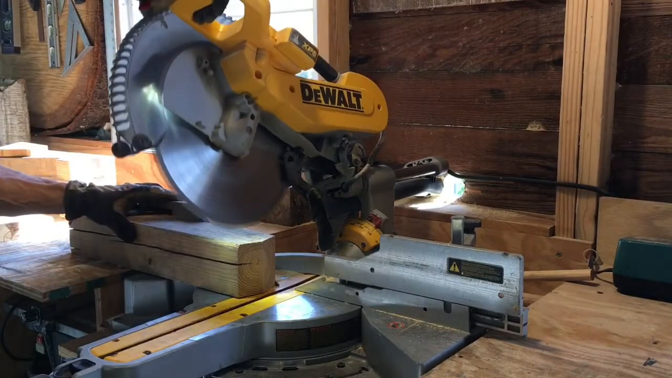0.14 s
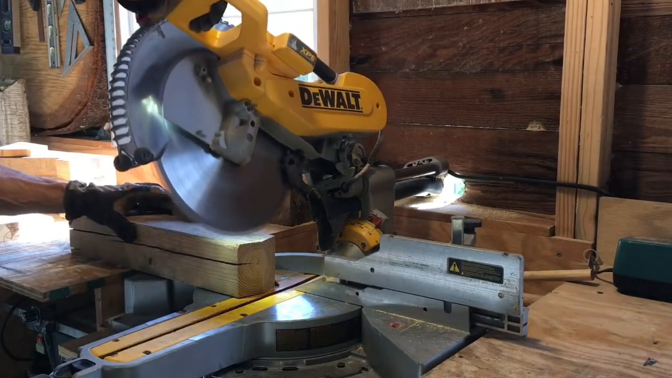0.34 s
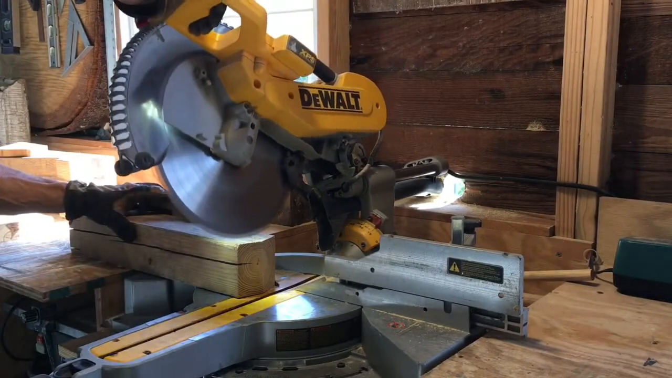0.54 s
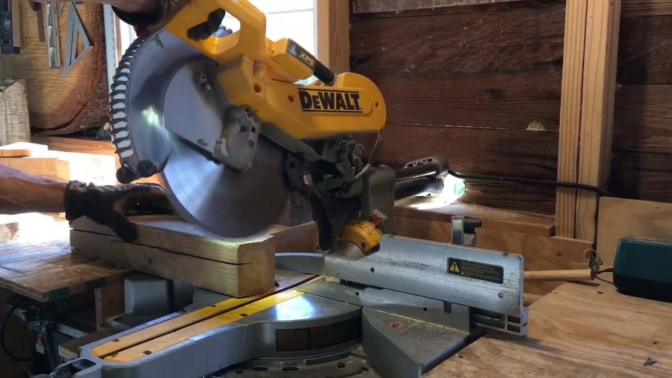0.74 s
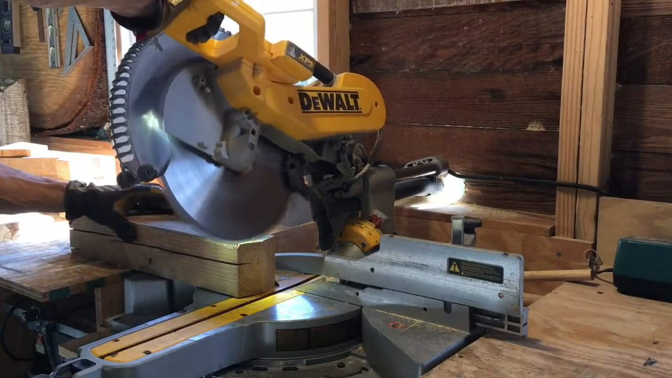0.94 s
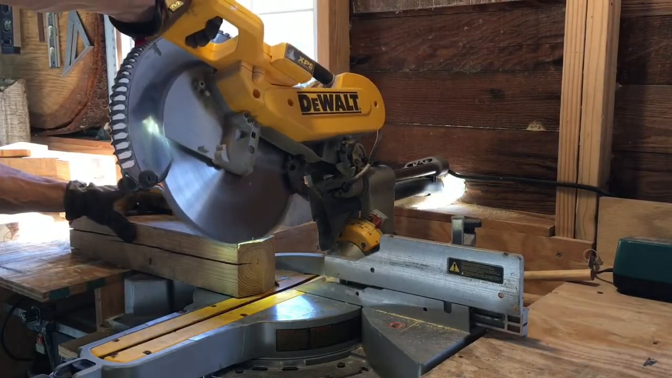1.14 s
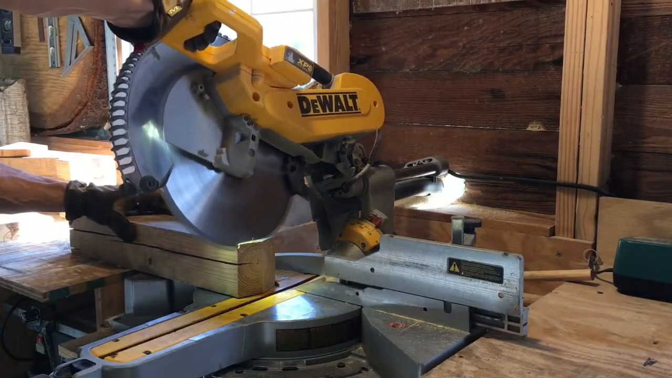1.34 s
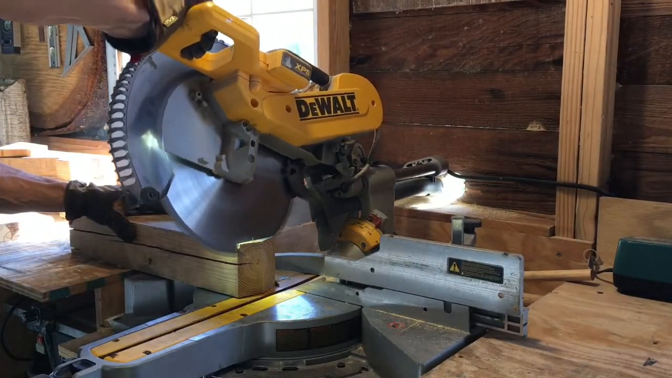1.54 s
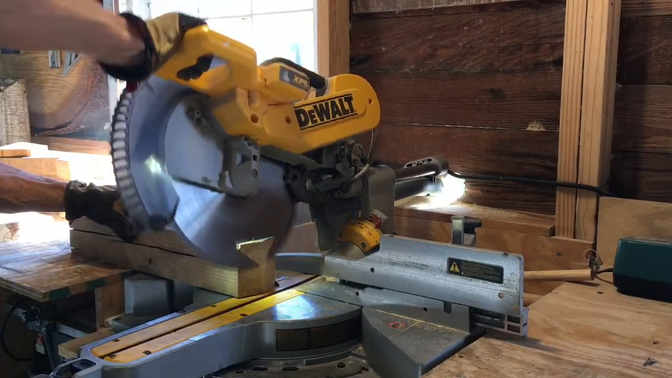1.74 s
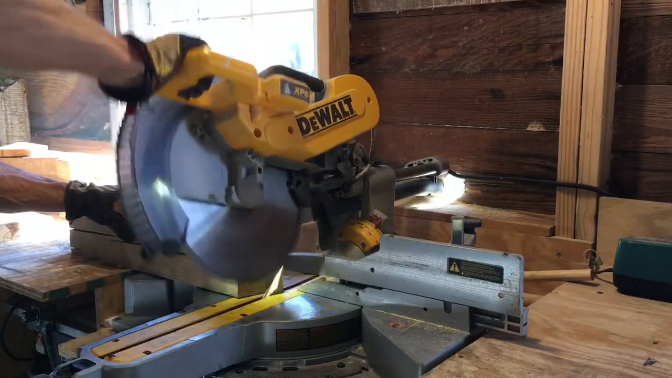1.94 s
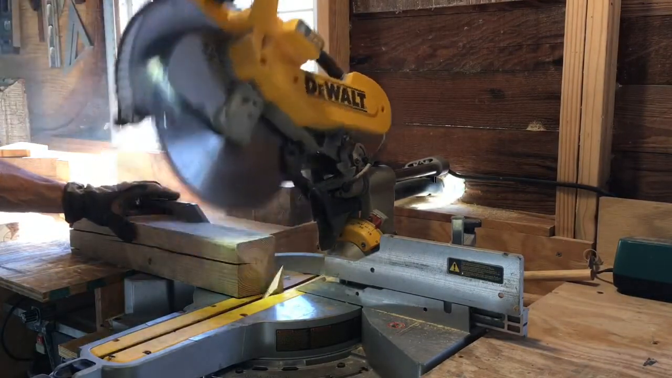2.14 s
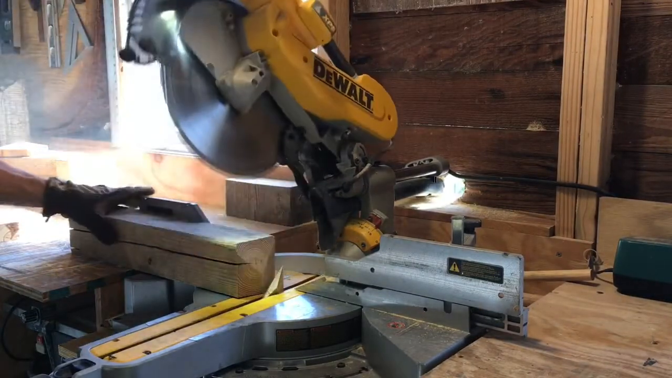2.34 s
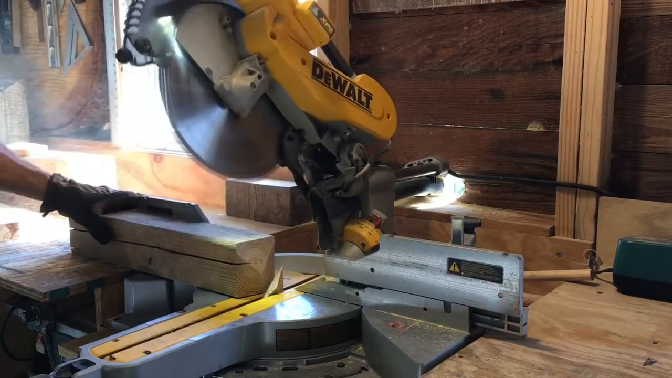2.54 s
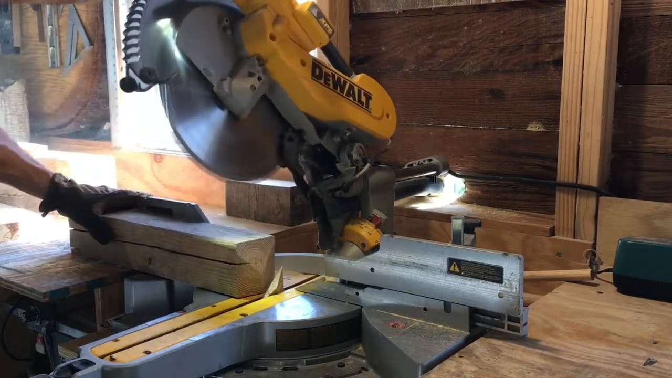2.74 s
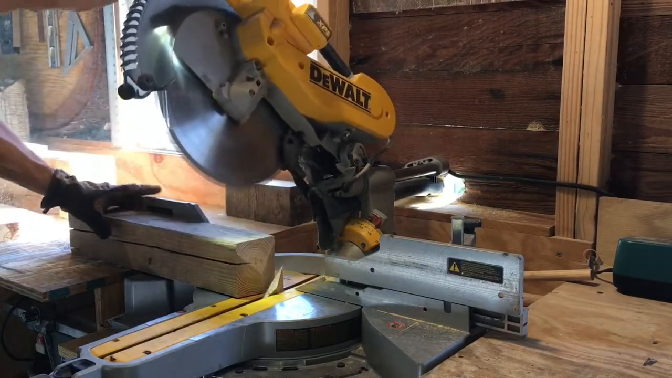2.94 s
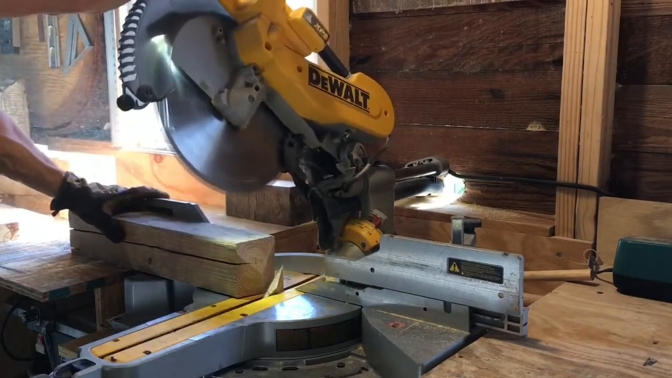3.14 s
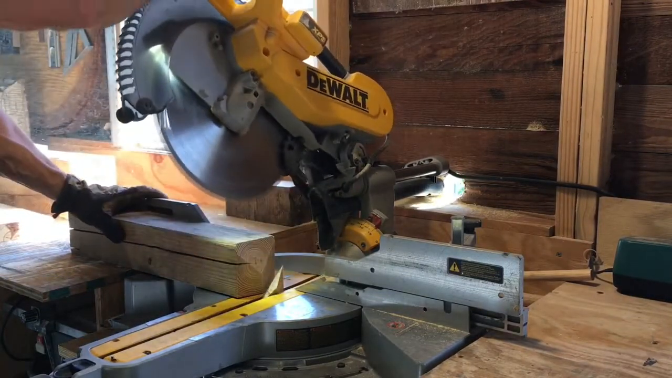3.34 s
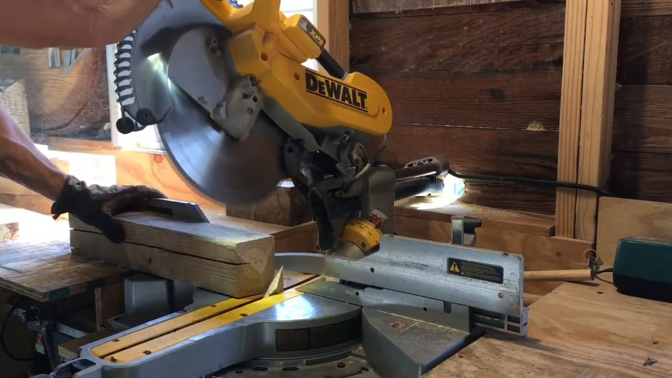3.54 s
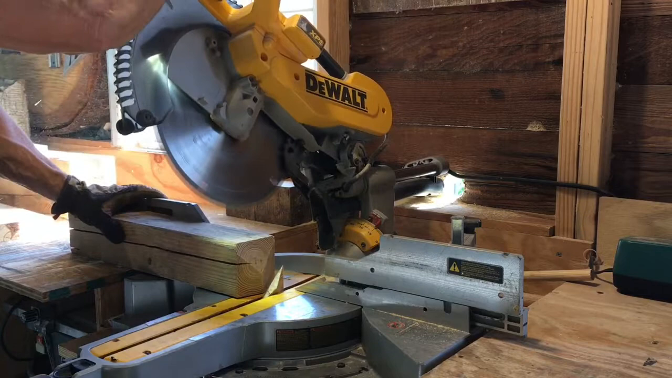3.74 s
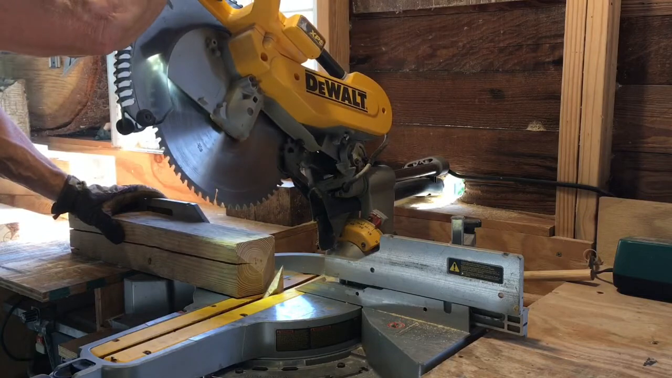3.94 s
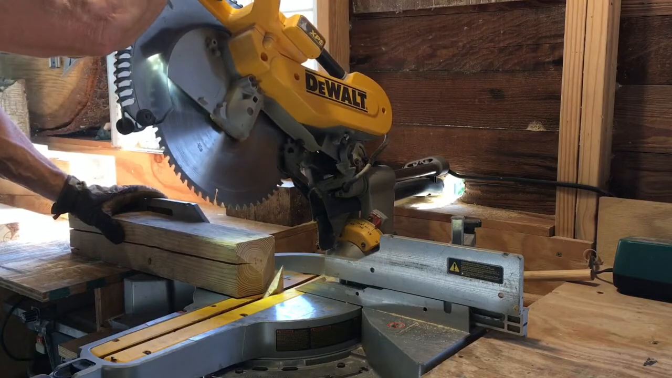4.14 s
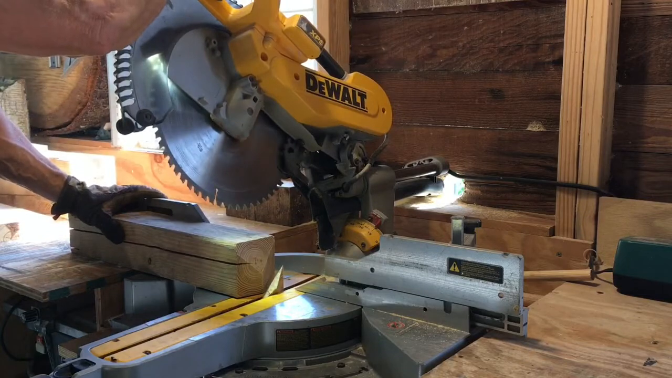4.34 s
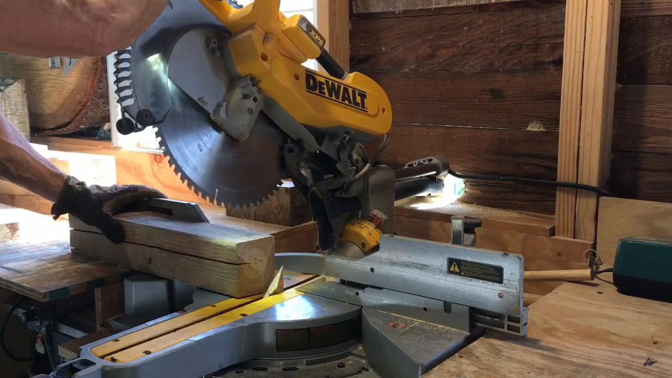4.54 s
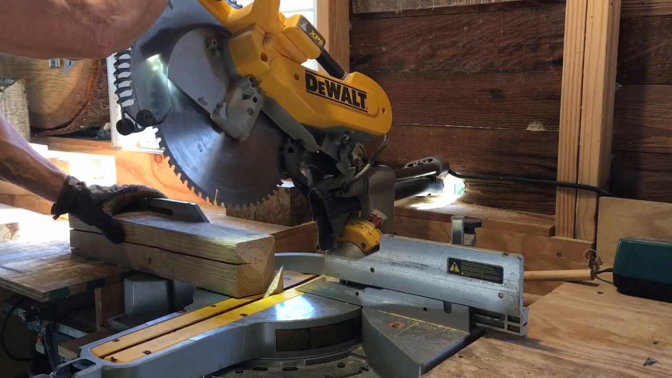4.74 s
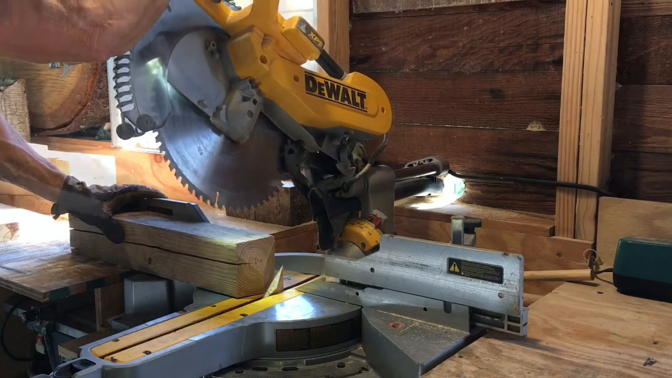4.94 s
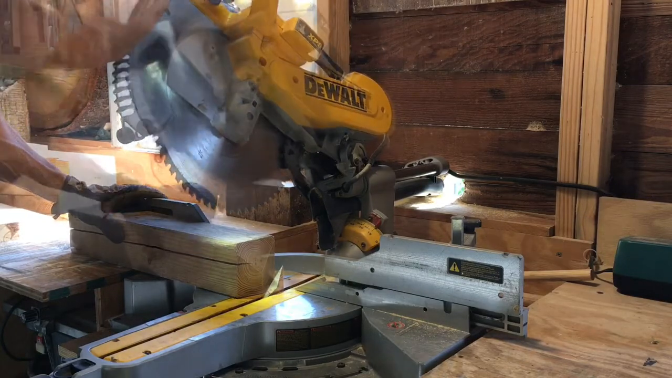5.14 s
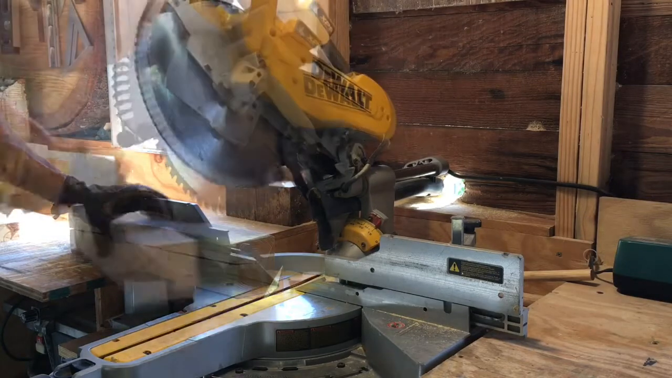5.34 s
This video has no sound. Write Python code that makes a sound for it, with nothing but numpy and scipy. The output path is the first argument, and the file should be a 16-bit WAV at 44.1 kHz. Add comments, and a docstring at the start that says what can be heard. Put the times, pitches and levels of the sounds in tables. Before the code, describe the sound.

Close up in a wooden workshop, a miter saw starts with a sharp jolt and gear grumble, its whirr rising quickly. Teeth rasp into a thick post with a harsh bright tearing, a dull knock and short blade squeals. The cut breaks through, the motor is released and its rough whine falls to rest. Faint blade ringing lingers over quiet room hum, until a clack and another burst of slowing whirr.

```python
"""A miter saw in a wooden workshop spins up, bites through a thick post and is braked with a falling whine.
The stopped blade rings on faintly until a second burst of whirring starts abruptly at speed and slows.
Shaft speed steers the motor's tones and noises; the teeth tear chips and excite the steel blade.
One close microphone hears the saw, a short answer from the plank walls, and the room's floor and hum."""
import sys
import numpy as np
from scipy import signal
from scipy.fft import rfft, irfft, next_fast_len
from scipy.io import wavfile
from scipy.ndimage import map_coordinates

SR = 44100
rng = np.random.default_rng(int(sys.argv[2]) if len(sys.argv) > 2 else 0)


def wrap_up_sound(samples):
    """Save the sound to the file named by the first command line argument, as 16-bit audio."""
    columns = np.atleast_2d(samples).T
    # keep every value between -1 and 1, then stretch to whole-number steps
    tamed = np.clip(columns, -1, 1)
    steps = np.round(tamed * 32767).astype(np.int16)
    wavfile.write(sys.argv[1], SR, steps)


N = 237743

TOP_HZ = 15780  # upper band limit of the sound
RELEASE_S, SECOND_BURST_S = 2.25, 4.8805  # the trigger is let go; the second burst starts
ENTER_S, THROUGH_S = .815, 1.76  # the teeth meet the post; they break through
FREE_HZ = 345.9  # shaft turns per second running free


def amp(db):
    """Decibels to gain."""
    return 10 ** (np.asarray(db) / 20)


def unit(x):
    """Scale to rms 1."""
    return x / np.sqrt(np.mean(x ** 2) + 1e-20)


def clock():
    """The time of every sample, in seconds."""
    return np.arange(N) / SR


def after(s, rise):
    """A switch that starts to open at time s and is fully open rise seconds later."""
    return np.clip((clock() - s) / rise, 0, 1)


def swell(s, length):
    """A bell-shaped envelope around time s."""
    return np.exp(-((clock() - s) / length) ** 2)


def along(points, hz):
    """(frequency [Hz], level [dB]) points read on a log frequency axis."""
    f, v = np.transpose(points)
    return np.interp(np.log(hz + 1), np.log(f), v)


def lift(resonances, hz):
    """Gain in dB that a set of resonances gives each frequency."""
    return sum(db / (1 + (2 * (hz - centre) / width) ** 2) for centre, width, db in resonances)


def wobble(rate):
    """A smooth random curve, rate knots a second."""
    return map_coordinates(rng.standard_normal(8192), [clock() * rate], mode="wrap")


def filtered(x, response):
    """x shaped by a gain that is a function of frequency."""
    m = next_fast_len(N + 8192)
    return irfft(rfft(x, m) * response(np.fft.rfftfreq(m, 1 / SR)), m)[:N]


def noise(colour):
    """Noise of rms 1 whose colour is a dB function of frequency."""
    return unit(filtered(rng.standard_normal(N), lambda hz: amp(colour(hz))))


def tone(hz, rough, width_hz):
    """A line of rms 1 on a fixed or moving pitch; the rough share is smeared over width_hz."""
    phase = 2 * np.pi * np.cumsum(hz * np.ones(N)) / SR + rng.uniform(0, 2 * np.pi)
    knots = rng.standard_normal((2, 4096))
    re, im = (np.interp(clock() * width_hz, np.arange(4096), k) for k in knots)
    rough = np.clip(rough, 0, 1)
    in_phase = np.sqrt(2 - 2 * rough) + np.sqrt(rough) * re
    return unit(in_phase * np.cos(phase) + np.sqrt(rough) * im * np.sin(phase))


def dip(depth_db):
    """Motor and room sound quieter from the cut until the saw winds down."""
    return amp(-depth_db * (after(0.82, 0.55) - after(RELEASE_S, 0.62)))


# Room tone of the workshop: (frequency [Hz], relative level [dB])
FLOOR_COLOUR = [(20, -21.5), (40, -2), (60, 7), (100, -2), (200, -5.5), (420, -12), (750, -12), (1200, -12),
                (2000, -13.5), (3000, -22), (7000, -32.5), (11700, -40), (15800, -45)]


def room_floor():
    """The room's broad noise and a rough low drone lie behind the saw and dip with it."""
    hush = amp(-51.5) * noise(lambda hz: along(FLOOR_COLOUR, hz))
    drone = amp(-60.5) * tone(58, rough=0.828, width_hz=45)
    return (hush + drone) * dip(depth_db=6)


def hum():
    """A faint hum and its octave hold steady in the room."""
    return amp(-63.0) * tone(119, rough=.3, width_hz=5.5) + amp(-64) * tone(238, rough=.3, width_hz=6.6)


def shaft_speed():
    """The motor gathers speed, sags as the cut deepens and slows under the brake; a burst at speed follows."""
    t = clock()
    start_hz, spin_up_s = 82, .41
    sag_hz, recover_s = 60.1, .25  # speed lost at the deepest point of the cut; time to regain it
    recovery = np.exp(-np.maximum(t - THROUGH_S, 0) / recover_s)
    depth = after(ENTER_S, THROUGH_S - ENTER_S) ** 1.5 * recovery
    speed = FREE_HZ - (FREE_HZ - start_hz) * np.exp(-(t / spin_up_s) ** 1.3) - sag_hz * depth
    # each exponential slowing: start [s], shaft speed there [Hz], rate of slowing [1/s]
    for s, hz, rate in [(RELEASE_S, 334.3, 1.975), (SECOND_BURST_S, 162.6, 1.85)]:
        speed = np.where(t < s, speed, hz * np.exp(-rate * (t - s)))
    return speed


# Colour of the opening jolt: (frequency [Hz], relative level [dB])
JOLT_COLOUR = [(200, -9), (700, 1), (1200, -6), (3700, -0.5), (8000, -6.5), (15800, -22)]


def opening_jolt():
    """A short broadband jolt opens the sound and dies away quickly."""
    level_db, decay_s = -15.5, 0.017
    return amp(level_db) * np.exp(-clock() / decay_s) * noise(lambda hz: along(JOLT_COLOUR, hz))


# Loose gears at start-up and just before rest: (time [s], length [s], level [dB])
GRUMBLES = [(0, 0.25, -27.5), (3.498, 0.27, -41.5)]


def grumble():
    """At low speed the gear teeth knock loosely and shake the guard's low modes."""
    # frequency [Hz], relative level [dB]
    guard = [(200, -18.5), (330, -8.5), (430, -11.5), (560, -2.5), (720, -1.0), (1000, -8),
             (1600, 0), (3000, -16.0), (6000, -50)]
    knocking = amp(2.6 * wobble(70))
    envelope = sum(amp(db) * swell(s, length) for s, length, db in GRUMBLES)
    return envelope * unit(noise(lambda hz: along(guard, hz)) * knocking)


def chatter(speed):
    """The gears load and unload once per turn of the blade."""
    blade_angle = 2 * np.pi * np.cumsum(speed / 5.3) / SR
    return unit(amp(1.0 * np.sin(blade_angle) + 0.58 * wobble(220)))


# Resonances of the motor housing and guard: (centre [Hz], width [Hz], lift [dB])
HOUSING = [(708, 88, 4.5), (1206, 90, 1.5), (1593, 88, 6), (1830, 85, 1.5), (2124, 310, 3.5),
           (3075, 110, 5), (3284, 140, 1.5), (3760, 280, 7), (6140, 260, 2), (9300, 280, 2.5),
           (11200, 500, 3), (14200, 700, 0.5)]


def housing(hz):
    """The colour that the motor housing and guard add, in dB."""
    return lift(HOUSING, hz)


def loudness(speed, law):
    """Gain of a motor noise: it grows with speed, drops faster below a knee and ends when the gears rest."""
    db, slope_db, knee_hz, steep_db = law
    octaves_below = np.log2(1 + (knee_hz / speed) ** 4) / 4
    turning = 1 - after(3.57, 0.45) + after(SECOND_BURST_S, 1 / SR)
    return turning * amp(db + slope_db * np.log2(speed / FREE_HZ) - steep_db * octaves_below)


# Loudness against shaft speed:
# (gain running free [dB], slope [dB/octave], knee [Hz], further slope below the knee [dB/octave])
WHIRR_LAW = (-18.5, 5.5, 37, 12)
HISS_LAW = (-27, 3.5, 110.5, 12)
# Broad whirr: (frequency [Hz], relative level under power [dB], relative level while braking [dB])
WHIRR_COLOUR = [(150, -24.5, -31), (398, -12, -18), (534, -2.5, -5), (938, -8, -4.5), (1630, -1, 0.5),
                (2517, 1, 0), (3538, -1, 5), (4800, -3.5, -5), (7100, -5.5, -3.5), (8540, -14.5, -30),
                (10900, -17.5, -30), (15930, -51.5, -37)]
# Air and brush hiss: (frequency [Hz], relative level [dB])
HISS_COLOUR = [(3000, -29.5), (6000, 2), (8000, -0.5), (10300, -10), (13000, -13), (16000, -22.5)]


def whirr(speed):
    """Fan air and brush hiss follow the shaft speed, coloured by the housing."""
    flow = loudness(speed, WHIRR_LAW) * dip(depth_db=9.5)
    # the hiss sets in just after the start
    hiss = loudness(speed, HISS_LAW) * dip(depth_db=6.0) * after(0.089, 0.066)
    braking = after(RELEASE_S, 0.042)
    # under power the fan dominates; while braking the gear case rattles higher
    power_colour = [(f, db) for f, db, _ in WHIRR_COLOUR]
    brake_colour = [(f, db) for f, _, db in WHIRR_COLOUR]
    powered = noise(lambda hz: along(power_colour, hz) + housing(hz))
    braked = noise(lambda hz: along(brake_colour, hz) + housing(hz))
    # turbulence at the fan's vanes makes a broad growl that follows their passing rate
    growl = amp(-7) * tone(6 * speed, rough=0.9, width_hz=400)
    growl *= np.clip(speed / 260, 0, 1) ** 2 * (1 - after(0.65, 0.87))
    air = flow * (powered * (1 - braking) + braked * braking + growl)
    air += hiss * noise(lambda hz: along(HISS_COLOUR, hz) + housing(hz))
    return air * chatter(speed)


def bench(x):
    """The bench under the saw booms in the bass."""
    return filtered(x, lambda hz: amp(lift([(116.0, 24, 3.8)], hz)))


# Loudness against shaft speed:
# (gain running free [dB], slope [dB/octave], knee [Hz], further slope below the knee [dB/octave])
RUMBLE_LAW = (-38.5, 2.84, 72, 7.5)
# Low rumble: (frequency [Hz], relative level [dB])
RUMBLE_COLOUR = [(25, -34.5), (60, -7.5), (120, 0), (190, -5.5), (300, -8), (500, -19), (900, -40.5)]


def drive_rumble(speed):
    """Shaft unbalance, the drive and the mains buzz of the field coils shake the bench."""
    braking = after(RELEASE_S, 0.042)
    unbalance = amp(-4.5) * tone(speed, rough=0.3, width_hz=8.3)
    unbalance *= after(ENTER_S, .05) * (1 - after(1.34, 0.71))
    drive = amp(-4.0) * tone(.7 * speed, rough=0.33, width_hz=15)
    buzz = amp(-5.5) * tone(120, rough=.15, width_hz=5.2) * (1 - 0.89 * after(0.68, .2))
    # a rough low tone takes over once the power is off
    slack = tone(.78 * speed, rough=0.8, width_hz=50) * np.clip(speed / 130, 0, 1) ** 2
    slack *= braking * (1 - 0.3 * after(SECOND_BURST_S, 1 / SR))
    low = amp(-4.5) * noise(lambda hz: along(RUMBLE_COLOUR, hz))
    low += (unbalance + drive + buzz) * (1 - braking) + slack
    return loudness(speed, RUMBLE_LAW) * dip(depth_db=12) * bench(low)


# Motor tones: (multiple of the shaft speed, level under power [dB], level while braking [dB])
ORDERS = [(6, -30, -36), (12, -38.5, -43), (14, -44.5, -46), (20, -36, -35), (26, -54, -39),
          (40, -54.5, -44.5), (60, -48.5, -36), (69, -52, -39.5)]
# A gear tone locks onto a resonance and shrieks:
# (time [s], length [s], multiple of the shaft speed, lift [dB])
FLARES = [(0.177, 0.14, 6, 5.5), (.45, 0.048, 6, 6), (2.392, 0.031, 14, 3.5), (2.544, 0.023, 20, 5),
          (2.6, 0.011, 20, 8.5), (2.668, .03, 20, 6.5), (2.847, 0.023, 60, 7), (3.107, 0.022, 60, 5),
          (3.3, 0.051, 60, 7), (3.357, 0.042, 20, 8), (4.91, 0.063, 20, 4), (4.907, 0.04, 26, 1),
          (5.14, 0.043, 60, 5.5), (5.302, 0.021, 60, 6.5)]
# How well the gear case radiates: (frequency [Hz], gain [dB])
RADIATION = [(200, -30.5), (500, -15.5), (750, -6.5), (1000, -6.5), (1500, -2.5), (2400, -4), (3500, 4),
             (4800, -2.5), (6800, 1.5), (9000, -3.5), (13000, -17), (16000, -29)]


def whine(speed):
    """Fan, gear and commutator tones swell as they sweep through the housing's resonances."""
    braking = after(RELEASE_S, 0.045)
    # under power the tones grow with speed; braking keeps them up until the shaft crawls
    effort = (1 - braking) * np.clip(speed / 250, 0, 1) + braking * (1 + (55 / speed) ** 3) ** -.75
    tones = np.zeros(N)
    for order, power_db, brake_db in ORDERS:
        pitch = order * speed
        flare_db = sum(db * swell(s, length) for s, length, k, db in FLARES if k == order)
        level_db = power_db + (brake_db - power_db) * braking + flare_db + 0.83 * wobble(34)
        # each line is rough and has a skirt of gear-rattle noise
        line = tone(pitch, rough=.45, width_hz=150) + amp(-10) * tone(pitch, rough=1, width_hz=600)
        tones += amp(level_db) * (pitch < TOP_HZ) * line
    # the tones sink into the roar as the blade is lowered
    screened = amp(-9 * (after(0.68, 0.26) - braking).clip(0, 1))
    running = 1 - after(3.36, .25) + after(SECOND_BURST_S, .0003)
    radiated = filtered(tones, lambda hz: amp(along(RADIATION, hz) + housing(hz)))
    return running * screened * effort * chatter(speed) * radiated


# Modes of the driven blade: (frequency [Hz], relative level [dB])
BLADE_MODES = [(845, -49), (1217, -48.5), (1771, -43), (2046, -49.5), (2600, -43), (3731, -44.5),
               (4274, -43.5), (4969, -50), (5507, -45.5), (5787, -49), (6024, -42.5), (6385, -47.5),
               (6500, -45.5), (7176, -42), (8070, -45.5), (8371, -48.5), (8662, -37.5), (9044, -39),
               (9238, -48.5), (9507, -44.5), (10164, -40.5), (10820, -48.5), (11391, -40.5), (11849, -49),
               (12344, -40.5), (13878, -49), (14325, -45), (15590, -42.5)]


def blade_steel():
    """The blade's modes, each kept ringing at a wavering level; rms 1 together."""
    return unit(sum(amp(db + 3.2 * wobble(9.09)) * tone(hz, rough=1.0, width_hz=68)
                    for hz, db in BLADE_MODES))


# Chips torn from the post: (frequency [Hz], relative level [dB])
CHIP_COLOUR = [(250, -22.5), (450, -17.5), (650, -3.5), (1020, -24.5), (1600, 1.5), (2300, -3),
               (3500, -9.5), (4600, -4.5), (6500, -5), (9000, -2.5), (12000, -0.5), (15800, -1.5)]
# Clusters and gaps among the blade's dense modes: (centre [Hz], width [Hz], lift [dB])
KERF = [(857, 51, 7), (1269, 46, -3.5), (2080, 200, 1), (2600, 60, -1), (4940, 350, -15), (5650, 350, 2),
        (6550, 290, 7.5), (7350, 380, -2.5), (8080, 430, 5), (9170, 280, 6), (10450, 320, -4),
        (10970, 400, 5.5), (12240, 450, 4.5), (12700, 450, -4), (14460, 300, 6), (15000, 350, -6.5),
        (15570, 340, 7.5)]


def tearing_chips(speed):
    """Each tooth strikes with its own random force and tears off a decaying burst of noise; rms 1."""
    tooth = np.cumsum(speed * 11.3) / SR
    force = amp(1.5 * rng.standard_normal(65536))[tooth.astype(int)]
    blows = force * np.exp(-1.2 * (tooth % 1))
    colour = lambda hz: amp(along(CHIP_COLOUR, hz) + lift(KERF, hz))
    return unit(filtered(blows * rng.standard_normal(N), colour))


# Teeth entering the wood: (frequency [Hz], relative level [dB])
RASP_COLOUR = [(300, -26.5), (1000, -15), (2000, -2), (4500, -1), (9000, 0.5), (11000, -5.5),
               (15800, -18.5)]


def entry_rasp():
    """The first teeth hit the bare surface, and the rasp fades as the wood closes round the blade."""
    envelope = amp(-18) * swell(ENTER_S + 0.057, 0.34)
    return envelope * noise(lambda hz: along(RASP_COLOUR, hz) + lift(KERF, hz))


# A mode squeals when the kerf pinches the blade: (time [s], length [s], frequency [Hz], level [dB])
SQUEALS = [(.88, .015, 6550, -24), (.923, .13, 2075, -29), (1.0, .12, 9200, -34), (1.15, .06, 5510, -40),
           (1.3, .4, 855, -47), (1.5, .13, 1790, -37.5), (1.52, .22, 1217, -40), (1.535, .048, 2600, -33),
           (1.599, .022, 6410, -24), (1.74, .025, 12300, -30), (1.76, .09, 1771, -29.5),
           (1.83, .08, 4969, -38), (1.97, .07, 1780, -38), (2.022, .13, 3730, -38)]


def squeals():
    """The pinched blade sings out on single modes, each swelling and fading."""
    return sum(amp(db) * swell(s, length) * tone(hz, rough=0.13, width_hz=44)
               for s, length, hz, db in SQUEALS)


def cut(speed):
    """Teeth tear chips from the post and keep the blade's modes ringing."""
    contact = after(ENTER_S, 0.013)
    leaving = np.maximum(clock() - THROUGH_S, 0) / 0.13
    bite = amp(-20) * contact * np.exp(-leaving ** 2.0)
    graze = amp(-26.5) * swell(2.195, 0.045)  # the blade brushes the cut face on its way up
    steel = blade_steel()
    scrape = amp(0.5) * tearing_chips(speed) + amp(-4.0) * steel
    flicker = amp(0.46 * wobble(130) + 0.72 * wobble(14))
    # rushing air alone keeps the blade faintly ringing before it meets the wood
    airborne = amp(-36.5) * (speed / FREE_HZ) ** 2 * (1 - contact) * steel
    return ((bite + graze) * scrape + contact * entry_rasp()) * flicker + squeals() + airborne


# Dull knocks during the cut: (time [s], level [dB])
THUMPS = [(1.163, -19.5), (1.309, -27.5)]


def thumps():
    """Each knock is a short push that slackens in pitch."""
    out = np.zeros(N)
    for s, db in THUMPS:
        age = np.maximum(clock() - s, 0)
        pitch = (55 + 260 * np.exp(-age / 0.0028)) * (age > 0)
        push = np.sin(2 * np.pi * np.cumsum(pitch) / SR)
        out += amp(db) * np.exp(-(age / 0.0051) ** 2) * push
    return out


# Free modes of the stopping blade:
# (frequency [Hz], level at the peak [dB], time to fall 60 dB [s], time of a brief fade [s])
RING = [(291, -66, 21, 4.4), (775, -56.5, 6.4, 4.07), (1263, -48.5, 11.5, 4.38), (1970, -52.5, 6.1, 4.28),
        (2047, -47, 5.6, 4.45), (3930, -60.5, 3.4, 3.56)]


def blade_ring():
    """The bare steel sings on after the motor has died; each mode decays, fading briefly on the way."""
    peak_s, rise_s = 3.4, 1
    age = np.maximum(clock() - peak_s, 0)
    modes = np.zeros(N)
    for hz, db, t60, fade_s in RING:
        fade = 1 - 0.76 * swell(fade_s, 0.18)
        modes += amp(db - 60 * age / t60) * fade * tone(hz, rough=0.055, width_hz=26)
    return after(peak_s - rise_s, rise_s) * modes


def last_tick():
    """The gears tick once more as they come to rest."""
    age = clock() - 3.653
    colour = [(1000, -19), (6000, 0), (15000, -8)]  # frequency [Hz], relative level [dB]
    return amp(-53) * (age > 0) * np.exp(-np.abs(age) / .007) * noise(lambda hz: along(colour, hz))


def burst_clack():
    """A short bright clack opens the second burst."""
    decay = after(SECOND_BURST_S, 1 / SR) * np.exp(-np.abs(clock() - SECOND_BURST_S) / 0.0032)
    return amp(-19) * decay * noise(lambda hz: along(RADIATION, hz))


def workshop(x):
    """Close plank walls add a short answer."""
    t = np.arange(SR // 4) / SR
    tail = rng.standard_normal(len(t)) * amp(-60 * t / 0.18) * (t > .003)
    return x + amp(-7) * signal.fftconvolve(x, tail / np.linalg.norm(tail))[:N]


def scene():
    """The saw in its room over a quiet floor with a faint hum, alike in both ears."""
    speed = shaft_speed()
    motor = opening_jolt() + grumble() + whirr(speed) + drive_rumble(speed) + whine(speed)
    saw = motor + cut(speed) + last_tick() + burst_clack()
    mono = workshop(saw) + thumps() + blade_ring() + room_floor() + hum()
    return np.array([mono, mono])


def record(dry):
    """The close microphone rounds off the highest peaks and keeps nothing above its band limit."""
    rounded = dry / (1 + np.abs(dry / .8) ** 6) ** (1 / 6)
    return np.array([filtered(channel, lambda hz: hz < TOP_HZ) for channel in rounded])


dry = scene()
out = record(dry)
wrap_up_sound(out)
```